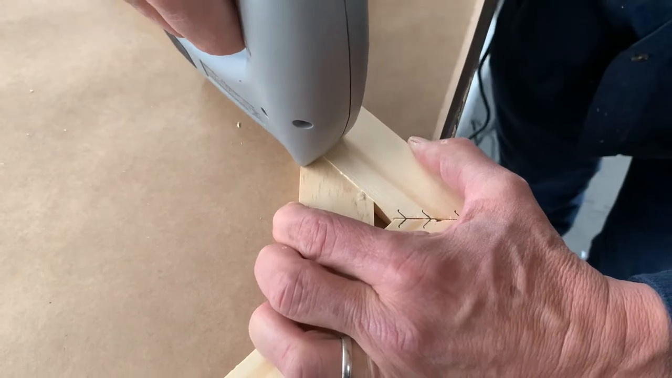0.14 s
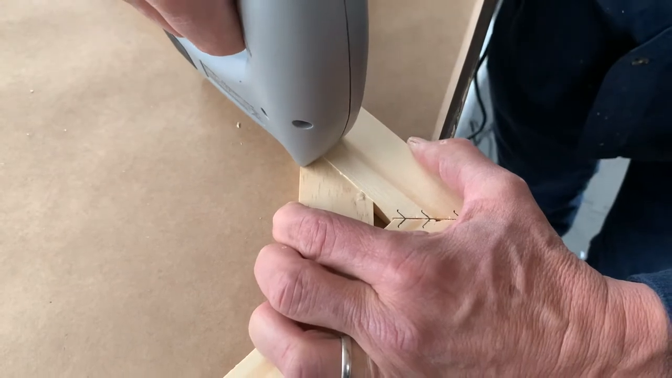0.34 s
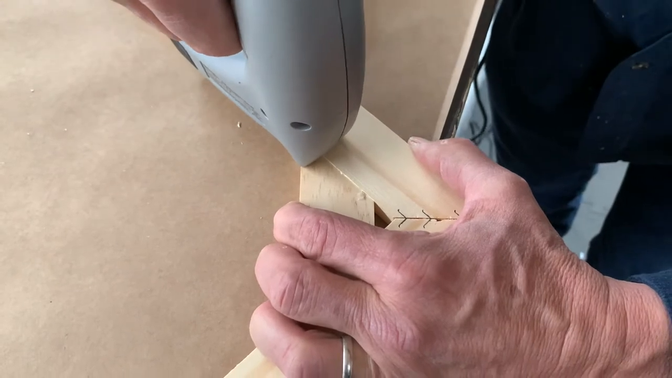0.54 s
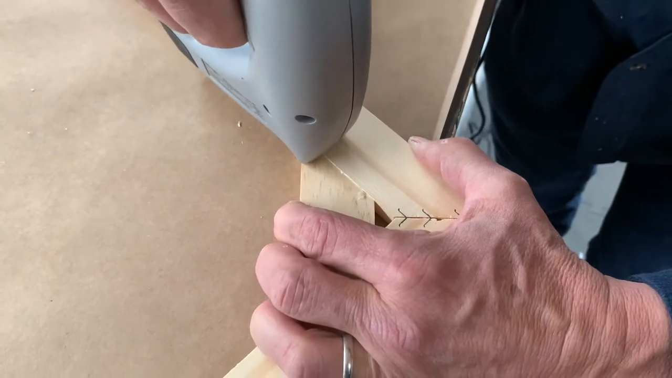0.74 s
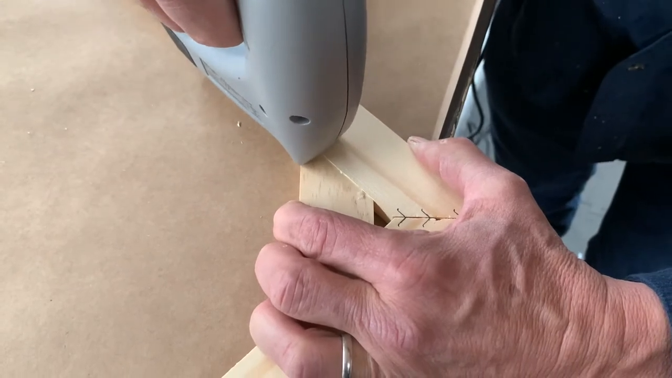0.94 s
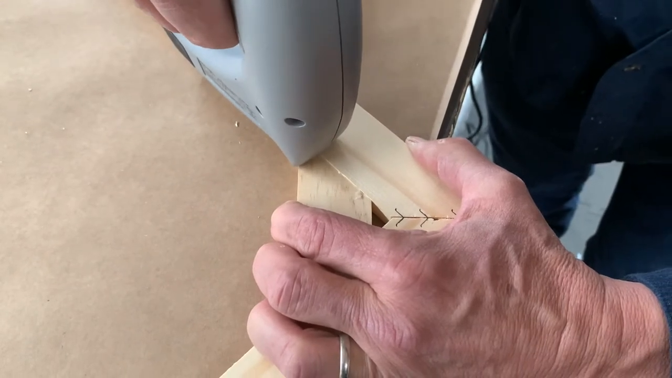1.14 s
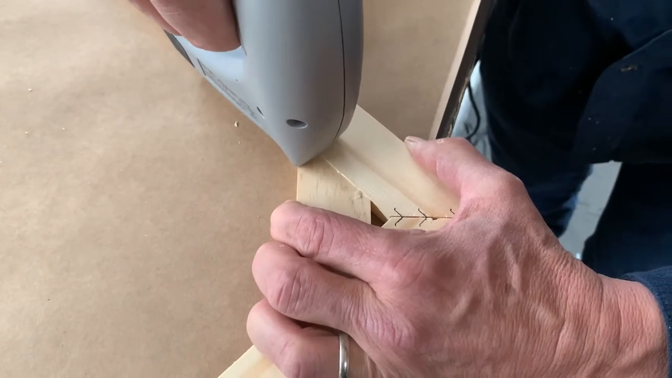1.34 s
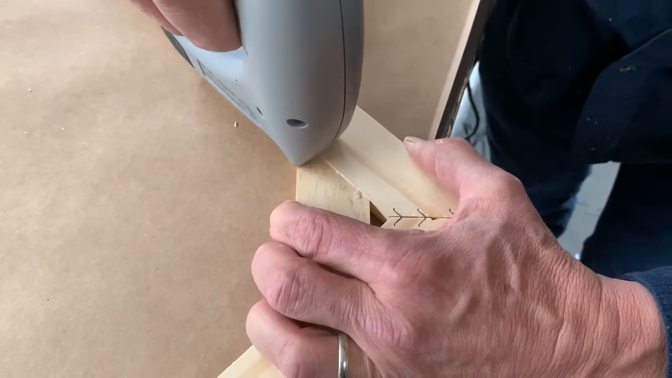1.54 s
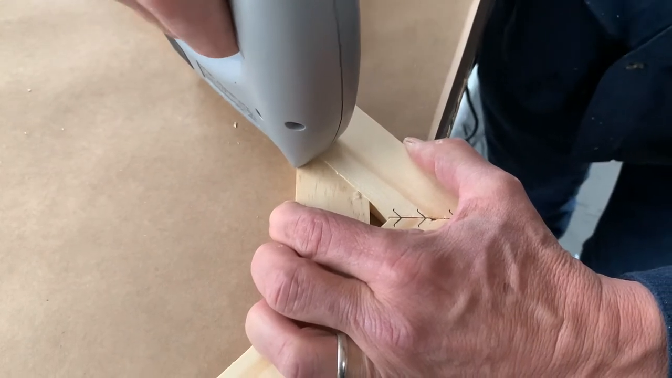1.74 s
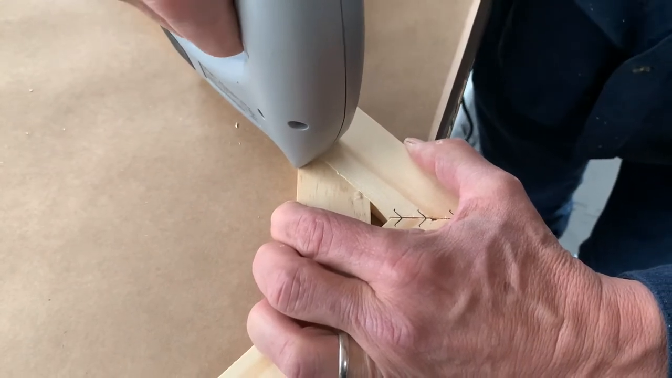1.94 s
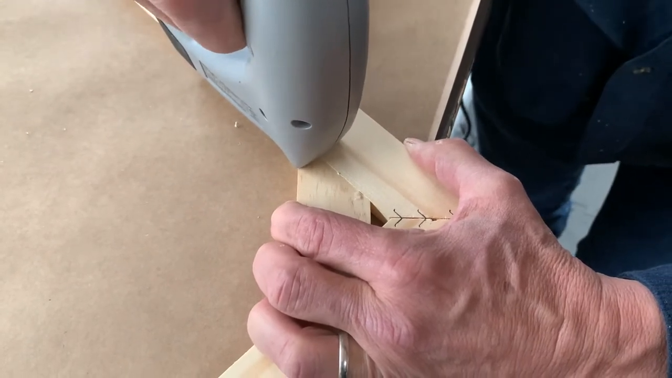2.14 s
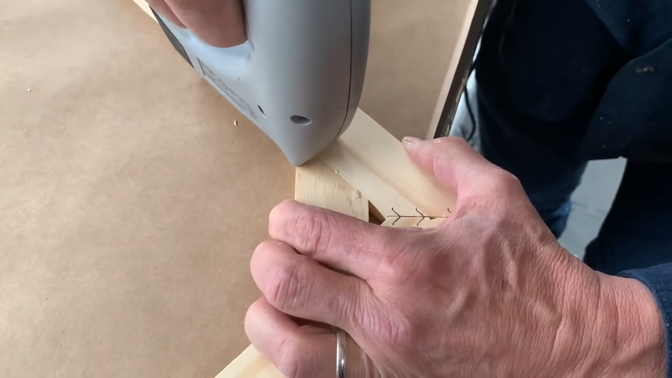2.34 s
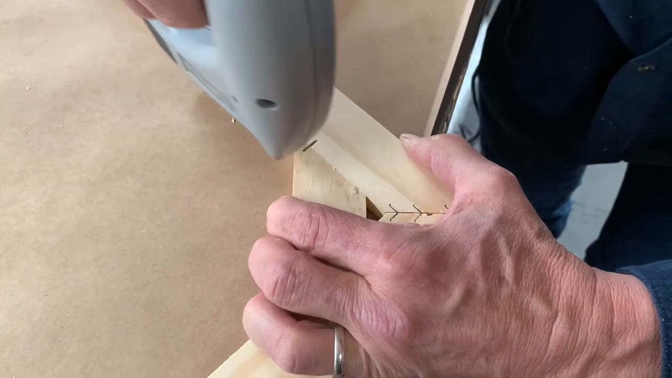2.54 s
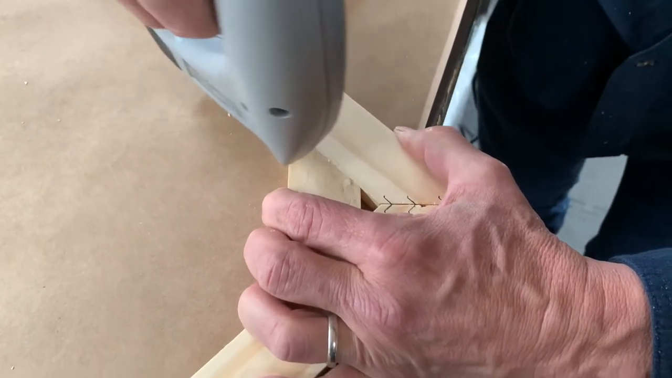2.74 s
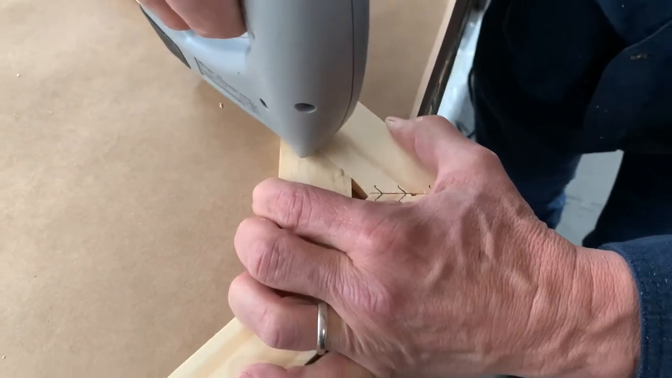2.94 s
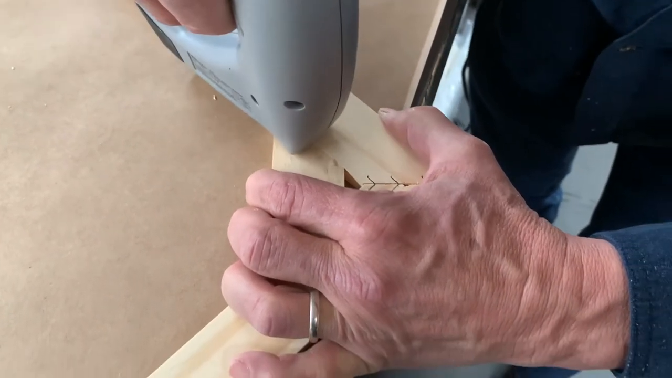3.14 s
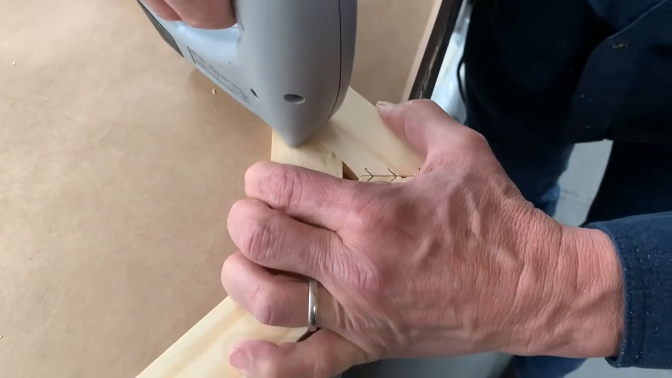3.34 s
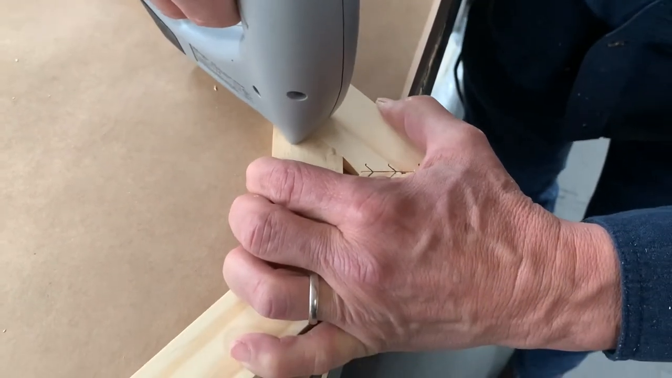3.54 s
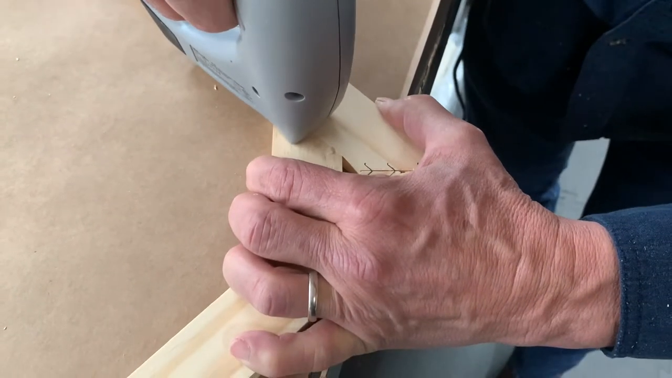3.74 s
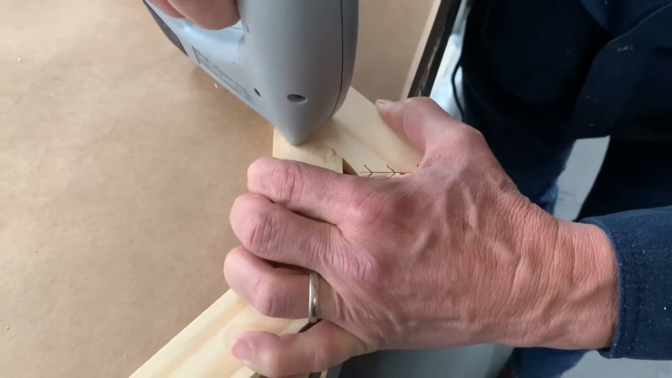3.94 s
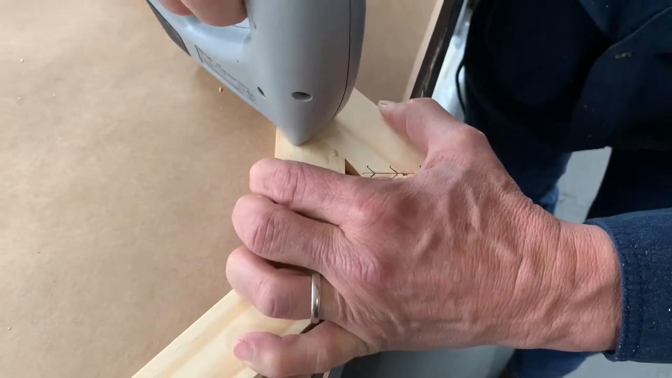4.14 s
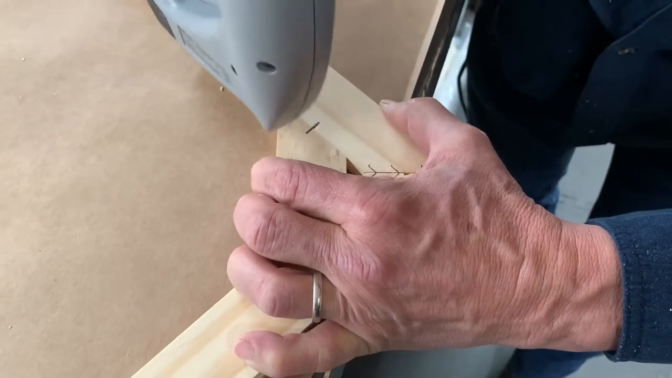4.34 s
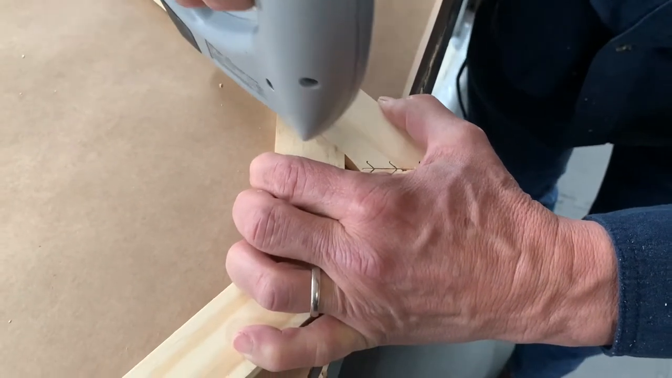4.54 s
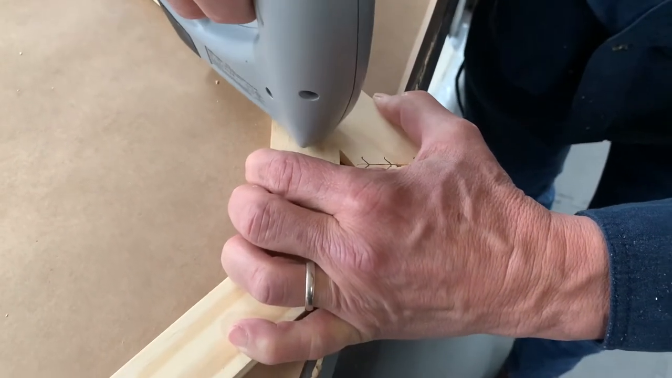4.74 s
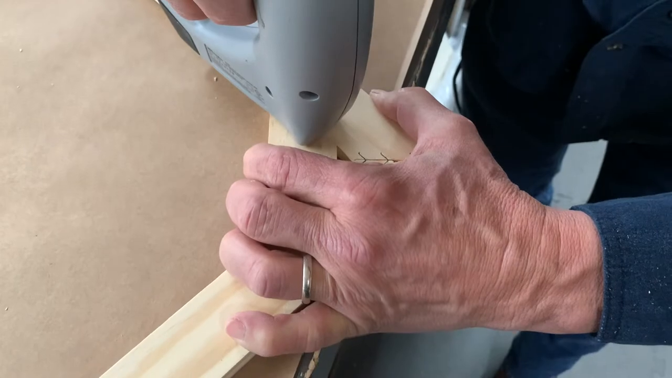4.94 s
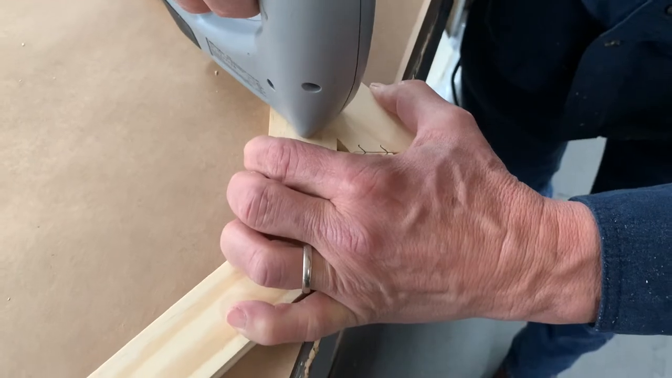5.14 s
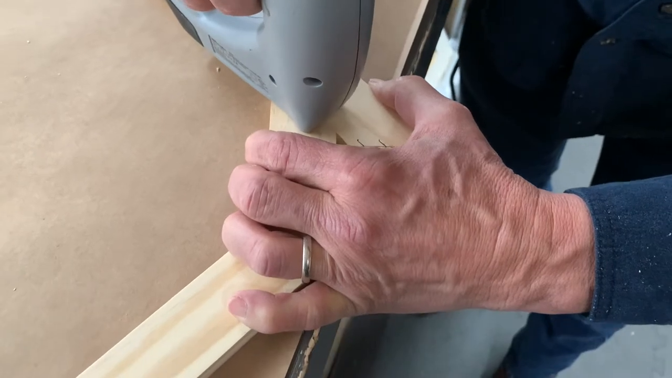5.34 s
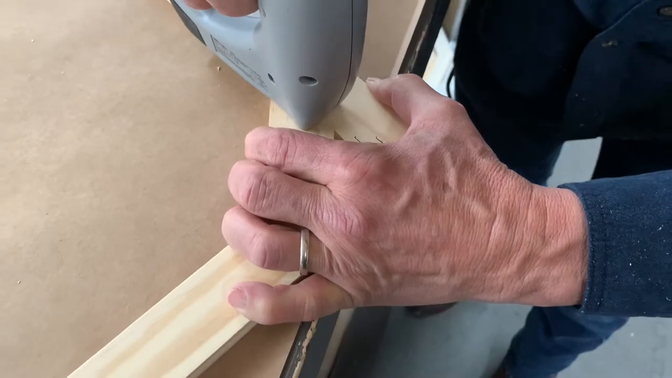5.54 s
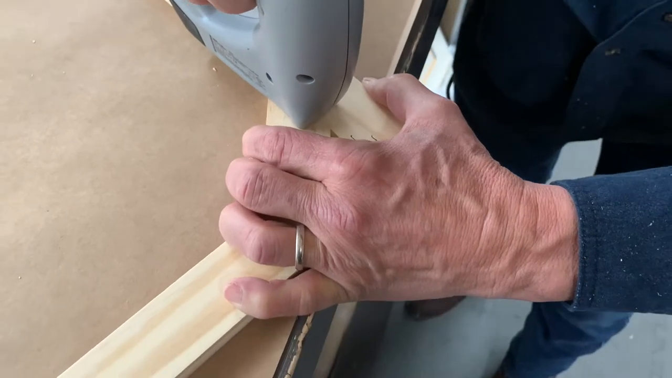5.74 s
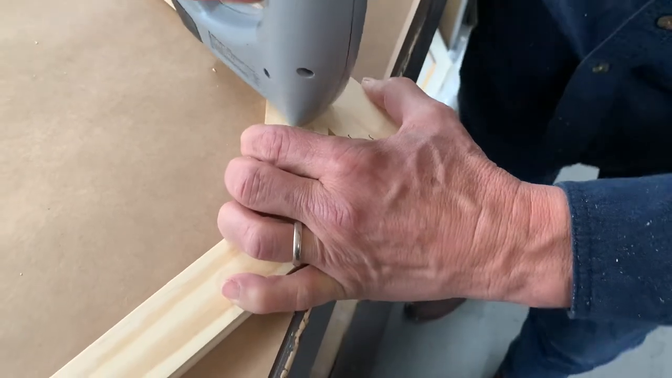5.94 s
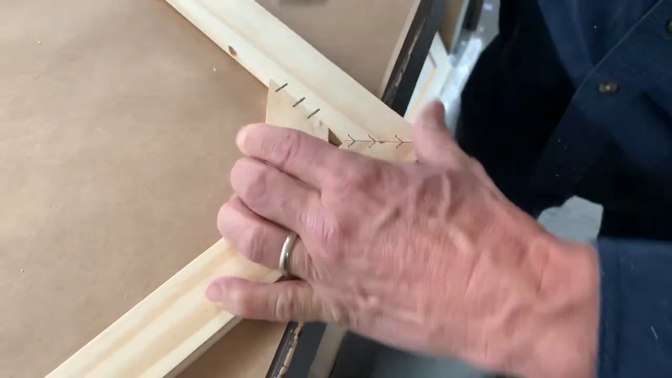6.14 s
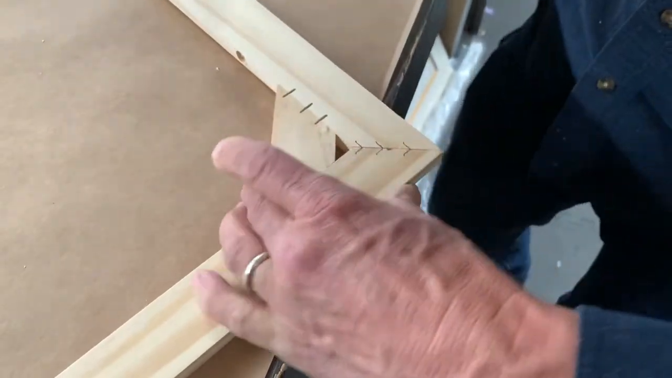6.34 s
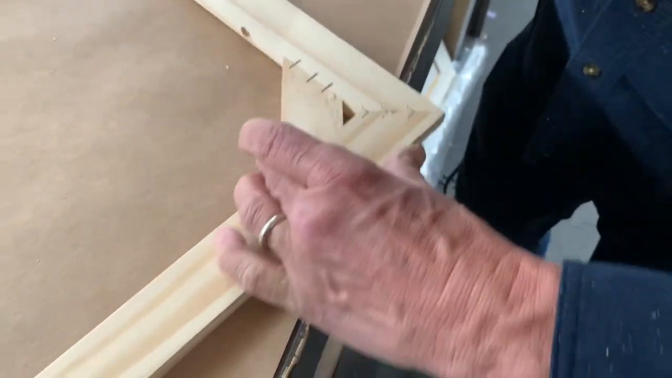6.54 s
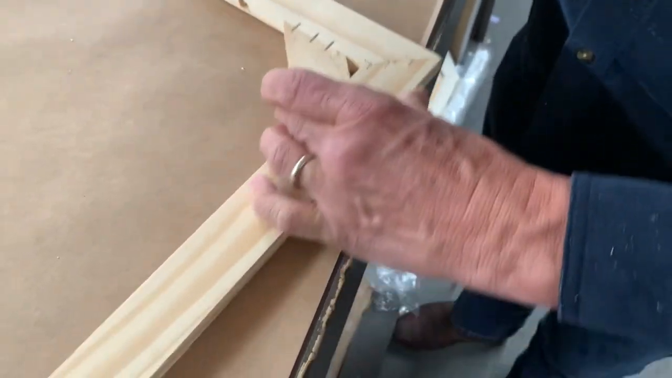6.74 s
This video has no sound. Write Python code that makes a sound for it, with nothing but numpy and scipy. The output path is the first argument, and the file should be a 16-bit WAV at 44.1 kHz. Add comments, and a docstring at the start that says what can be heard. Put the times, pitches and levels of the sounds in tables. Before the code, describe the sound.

A staple gun drives three staples into a wooden frame, each a sharp double clack with a metallic rattle, woody ring and short room tail. Between blows there are low bumps, taps and grainy rubbing, much quieter. A faint high electrical whine and low rumble sit beneath, an engine drones dimly outside late on, and wood scrapes at the end. Close microphone, small lively workshop.

```python
"""An electric staple gun drives three staples into a pine frame on a hollow bench, close to a two-port microphone:
each blow sums pushed ringing modes of the bench with bursts of coloured noise for the steel driver.
Between shots hands and tool knock, tick and rub on the wood (decaying sines, noise bursts, grainy noise),
and at the end the frame slides over the bench top. A lamp ballast whines faintly in sines over hiss and hum,
the workshop rumbles in low noise, and an engine drones by outside as a few gliding harmonics."""
import sys
import numpy as np
from scipy import signal
from scipy.fft import rfft, irfft
from scipy.io import wavfile
from scipy.ndimage import uniform_filter1d

SR = 44100
rng = np.random.default_rng(int(sys.argv[2]) if len(sys.argv) > 2 else 0)


def put_to_file(sound):
    """Save the sound as 16-bit audio at rate SR, in the file named by the first command-line argument."""
    columns = np.atleast_2d(sound).T  # one column per channel
    safe = np.clip(columns, -1, 1)
    whole_steps = np.round(safe * 32767)
    wavfile.write(sys.argv[1], SR, whole_steps.astype(np.int16))


N = 299880  # samples, 6.8 s

# Ringing modes of frame and bench. Each row: frequency in Hz, relative level in dB, time to fall 60 dB in seconds.
BENCH_MODES = [(72.46, 2.5, .22), (97, -9, 0.022), (143, -11.5, 0.049), (189, -5.5, 0.059),
               (267, -10, 0.079), (302, -6, 0.049), (412, -0.5, 0.024), (534, -11.5, 0.024),
               (673, -13, 0.089), (758, -19, 0.085), (956, -11.5, 0.14), (1126, -24.5, 0.17),
               (1910, -13.5, 0.28), (1985, -17.5, 0.096), (2320, -24, .05)]
# Bright spectrum of wood sliding and of tick edges. Each row: frequency in Hz, relative level in dB.
BRIGHT_WOOD = [(6500, -13), (7500, -1.5), (9500, -4), (11500, -6), (14000, -7.5), (16000, -12)]


def gain_of(db):
    """Decibels to amplitude."""
    return 10 ** (np.asarray(db) / 20)


def evened(x):
    """Scales to rms 1."""
    return x / np.sqrt(np.mean(x ** 2) + 1e-20)


def read(points, hz):
    """Reads a table on a log-frequency axis."""
    f, value = np.transpose(points)
    return np.interp(np.log(hz + 1), np.log(f + 1), value)


def add(mix, s, sound):
    """Mixes a sound in at time s."""
    part = mix[max(round(s * SR), 0):][:len(sound)]
    part += sound[:len(part)]


def coloured(x, spectrum):
    """Gives x a spectrum, cut off just beyond its ends, at rms 1."""
    hz = np.fft.rfftfreq(len(x), 1 / SR)
    inside = (hz > spectrum[0][0] * 0.8) & (hz < spectrum[-1][0] * 1.1)
    return evened(irfft(rfft(x) * gain_of(read(spectrum, hz)) * inside, len(x)))


def background():
    """Ballast whine as steady sines and hiss unlike at the two ports, over mains hum."""
    # Whine lines, at about multiples of twice the mains apart. Each row: frequency in Hz, rms in dB before the drift.
    whine_lines = [(8296, -105), (8533, -105), (8656, -101), (8775, -103), (8893, -99.5), (9017, -90),
                   (9135, -94), (9254, -93), (9372, -97), (9733, -107)]
    # Mains hum. Each row: frequency in Hz, rms level in dB.
    hum_lines = [(60, -77), (120, -85), (242, -79)]
    # Spectrum of the hiss. Each row: frequency in Hz, relative level in dB.
    hiss_colour = [(300, -5.5), (480, -6.5), (1300, -10.5), (4000, -18), (7200, -19.5), (9100, -15.5),
                   (11500, -18), (14500, -22.5), (16000, -31.5)]
    # Whine and hiss swell a little, then grow fainter. Each row: time in seconds, gain in dB.
    treble_drift = [(0, 0.5), (2.0, 4.5), (3.6, -1.5), (4.2, -6.5), (6.8, -11)]
    hiss_db = -82  # rms, before the drift
    t = np.arange(N) / SR

    def sines(lines):
        """Steady sines, each from a random phase."""
        return sum(np.sqrt(2) * gain_of(db) * np.sin(2 * np.pi * (hz * t + rng.random()))
                   for hz, db in lines)

    noise = rng.standard_normal((2, N))
    hiss = gain_of(hiss_db) * np.array([coloured(z, hiss_colour) for z in noise])
    drift = gain_of(np.interp(t, *np.transpose(treble_drift)))
    return drift * (sines(whine_lines) + hiss) + sines(hum_lines)


def gestures(rows, column):
    """Amplitude over the scene: each gesture swells in, holds and fades out; overlaps add in power."""
    ramp_db = 23.5  # how far below its hold level a gesture starts and ends
    t, power = np.arange(N) / SR, np.zeros(N)
    for row in rows:
        start, rise, hold, fall = row[:4]
        share = np.minimum((t - start) / rise, (start + rise + hold + fall - t) / fall)
        level_db = row[column] - ramp_db * (1 - np.clip(share, 0, 1))
        power += (share > 0) * gain_of(level_db) ** 2
    return np.sqrt(power)


def ports(x, knee_hz):
    """The left port leads, by up to a quarter turn above the knee, with a level difference."""
    # Balance of the ports. Each row: frequency in Hz, left minus right in dB.
    balance = [(60, 0), (300, -1), (700, 3), (1500, -2), (4400, -4), (6500, -2), (8000, 0)]
    hz = np.fft.rfftfreq(N, 1 / SR)
    lead = np.exp(1j * np.pi / 4 * np.tanh(hz / knee_hz))
    half = gain_of(read(balance, hz) / 2) * lead  # each side takes half the difference
    return irfft(rfft(x) * np.array([half, 1 / half]), N)


def handling():
    """Lumpy shaking of the bench; grainy friction spread along the wood, so unlike at the two ports."""
    # Hands lean on the frame and shake the bench. Each row: start, rise, hold and fall in seconds,
    # level of the deep boom in dB, level of the frame's body in dB.
    presses = [(0.0, 0.011, 0.042, 1.15, -64.5, -72), (1.55, 0.29, 0.56, 0.69, -49, -51.5),
               (3.3, .3, .1, .2, -55, -76), (3.62, .13, 0.22, 0.37, -51, -50.5),
               (5.25, 0.29, 0.096, 1.15, -57, -60.5), (6.4, 0.2, 0.14, 0.15, -54.5, -54.5)]
    # Strokes of wood on wood and card. Each row: start, rise, hold and fall in seconds,
    # level of the low rub in dB, of the treble in dB, of the sudden catches in dB.
    strokes = [(0.0, 0.007, 0.055, 0.13, -77.5, -90, -83), (1.56, .15, .26, .13, -75, -83, -66),
               (3.67, 0.047, 0.16, .02, -69, -79.5, -65), (5.38, .17, .01, .02, -69, -81, -63.5),
               (5.7, 0.26, .42, 0.062, -67, -67.5, -77), (6.3, 0.16, 0.096, 0.77, -59, -56.5, -77),
               (6.35, 0.31, 0.033, 0.59, -52, -50.5, -73)]
    # Spectra of the deep boom, the frame's body and the low rub. Each row: frequency in Hz, relative level in dB.
    boom_colour = [(12, -59.5), (20, -33), (43, -17), (59, -0.5), (72, -6.5), (97, -15.5), (135, -15),
                   (180, -50.5), (300, -120)]
    body_colour = [(71, -43), (120, -19.5), (189, -2), (265, -6.5), (306, -2.5), (370, -19), (513, -16),
                   (606, -49.5), (800, -28), (1040, -60), (1760, -120)]
    low_colour = [(300, -4), (430, -8), (530, -2), (650, -12.5), (1500, -12.5), (3000, -14), (5000, -14.5),
                  (7000, -21)]
    rest_boom_db, rest_body_db = -70.5, -79.5  # workshop rumble that never stops
    slips_per_s, slip_spread_db, slip_s = 37, 2.5, 0.0017

    boom, body, left, right, high, lumps, grain = rng.standard_normal((7, N))
    lumps = gain_of(3.0 * evened(uniform_filter1d(lumps, size=1200)))
    grain = gain_of(1.42 * evened(uniform_filter1d(grain, size=500)))  # slips shared by both bands

    boom_level = np.hypot(gestures(presses, column=4), gain_of(rest_boom_db))
    body_level = np.hypot(gestures(presses, column=5), gain_of(rest_body_db))
    shake = boom_level * coloured(boom, boom_colour) + body_level * coloured(body * lumps, body_colour)

    slip_starts = rng.random(N) < slips_per_s / SR
    slips = slip_starts * gain_of(slip_spread_db * np.minimum(rng.exponential(1, N), 3))
    slips = signal.lfilter([1], [1, -np.exp(-1 / (slip_s * SR))], slips)  # each slip dies away
    catches = slips * gestures(strokes, column=6)

    low = np.array([coloured(z * grain, low_colour) for z in (left, 0.13 * left + right)])
    treble = gestures(strokes, column=5) * coloured(high * grain, BRIGHT_WOOD)
    rub = (gestures(strokes, column=4) + catches) * low + treble
    return ports(shake, knee_hz=700) + rub


def knocks():
    """Dull knocks: a few soft cycles at the pitch of the struck spot, swelling over the first cycle."""
    # Knocks on bench and frame. Each row: start in seconds, level in dB, pitch in Hz,
    # time to fall 60 dB in seconds.
    struck_spots = [(0.203, -41.5, 63, .15), (0.317, -41.5, 67.5, .1), (0.33, -49, 194, .08),
                    (0.892, -36, 64, .057), (1.668, -31.5, 180.6, .057), (1.68, -25.5, 73, .072),
                    (1.741, -29.5, 65, .14), (1.855, -35, 207, .12), (1.892, -30.5, 71.74, .14),
                    (2.3, -42, 62.05, 0.17), (2.496, -31, 64.87, .086), (2.499, -34.5, 210, .05),
                    (2.545, -56, 60, .18), (2.838, -41.5, 273.1, .096), (2.84, -53, 560, .08),
                    (3.484, -24.5, 71.2, .2), (3.685, -43.5, 203.3, .06), (4.574, -35.5, 75, .12),
                    (5.2, -33, 74.7, .16), (6.102, -40.5, 75, .16), (6.525, -54, 535, .12),
                    (6.69, -47, 524, .12), (6.75, -49.5, 539, .1)]
    out, t = np.zeros(N), np.arange(SR // 4) / SR
    for s, db, hz, t60 in struck_spots:
        rise = (1 - np.exp(-t * hz * 1.5)) ** 2
        add(out, s, gain_of(db - 60 * t / t60) * rise * np.sin(2 * np.pi * hz * t))
    return out


def bench_ring(push_s, modes=BENCH_MODES):
    """A soft push of given length; the air follows the acceleration of each mode. Peak 1."""
    t = np.arange(SR // 3) / SR
    ring = -sum(gain_of(db - 60 * t / t60) * np.cos(2 * np.pi * hz * t) for hz, db, t60 in modes)
    ring = signal.oaconvolve(ring, np.hanning(round(push_s * SR)))
    return ring / abs(ring).max()


def ticks(rows, dying_s):
    """Short noise bursts around a centre pitch, some with a bright edge, some tapping the frame."""
    width = 1.1  # the colour's shoulders lie this factor either side of the centre
    out, t = np.zeros(N), np.arange(3000) / SR
    frame = bench_ring(0.0018, BENCH_MODES[4:9])  # the light frame alone
    fading = np.exp(-t / dying_s)
    noise = rng.standard_normal((len(rows), 2, len(t)))
    for (s, db, hz, bright_db, frame_db), (body_noise, edge_noise) in zip(rows, noise):
        colour = [(500, -15), (hz / width, -8), (hz, 0), (hz * width, -9), (14000, -38)]  # (Hz, dB)
        body = coloured(body_noise, colour) * fading
        edge = gain_of(bright_db) * coloured(edge_noise, BRIGHT_WOOD) * fading ** 2
        add(out, s, gain_of(db) * (body + edge))
        add(out, s, gain_of(db + frame_db) * frame)
    return out


def shots():
    """The driver rattles down its channel, slams the staple home and clacks back."""
    # The three shots. Each row: time of the main blow in seconds, blow in dB, driver rattle in dB,
    # rebound delay in seconds, rebound blow in dB, rebound clack in dB, hiss that swells in ahead in dB,
    # its rise in seconds, how far ahead of the blow it is full in seconds.
    staples = [(2.1149, -1, -13, 0.0079, -9, -11, -15.5, 0.0026, 0.015),
               (3.9152, -0.5, -12, 0.0081, -7, -9, -18, 0.0069, 0.0058),
               (5.5829, -0.5, -12, 0.0083, -10.5, -6, -20.5, 0.0064, 0.0039)]
    # Spectra of the driver in its channel and of the hiss ahead. Each row: frequency in Hz, relative level in dB.
    steel_colour = [(500, -4), (1000, 2), (2000, -9.5), (3200, -3.5), (6000, -9), (8500, -6.5), (11500, -7),
                    (14000, -14), (16000, -17.5)]
    lead_colour = [(900, -14.5), (2000, 2), (3500, -4), (6500, -7), (8000, -7.5), (9000, -39.5)]

    out, t = np.zeros(N), np.arange(-0.035, 0.06, 1 / SR)  # t = 0 at the main blow
    slow, hard, sharp = bench_ring(0.0039), bench_ring(0.002), bench_ring(0.00071)
    rattle = np.clip((t + 0.0085) / 0.004, 0, 1) * np.exp(-np.maximum(t + 0.001, 0) / 0.0008)
    buzz = 0.34 * np.exp(-np.maximum(t, 0) / 0.0066) * (t > -0.004)  # the casing buzzes on
    for s, blow_db, rattle_db, delay, rebound_db, clack_db, lead_db, rise, ahead in staples:
        steel, lead = rng.standard_normal((2, len(t)))
        clack = np.exp(-np.where(t < delay, (delay - t) / 0.00017, (t - delay) / 0.0018))
        swell = np.exp(np.minimum(t + ahead, 0) / rise) * np.clip(-t / 0.0021, 0, 1)
        driver_level = gain_of(rattle_db) * (rattle + buzz) + gain_of(clack_db) * clack
        driver = coloured(steel, steel_colour) * driver_level
        lead_in = gain_of(lead_db) * swell * coloured(lead, lead_colour)
        add(out, s + t[0], driver + lead_in)
        add(out, s - 0.005, gain_of(blow_db - 8.0) * sharp)  # the coil pulls and the tool kicks
        add(out, s - 0.0009, -gain_of(blow_db - 1.5) * sharp)  # the staple enters
        add(out, s, gain_of(blow_db) * hard)
        add(out, s + 0.0027, -gain_of(blow_db - 8) * slow)  # the bench top springs back
        add(out, s + delay, gain_of(rebound_db) * sharp)
    return out


def engine():
    """Only the lowest firing orders come through the wall, gliding in pitch and level."""
    # The engine's course. Each row: time in seconds, firing frequency in Hz, level in dB.
    course = [(4.22, 76.3, -72), (4.45, 78.7, -67.5), (4.75, 80.65, -62), (5.09, 84.4, -64.5),
              (5.301, 85.5, -68), (5.55, 84.4, -58.5), (5.9, 82.63, -70), (6.15, 83.6, -65),
              (6.45, 83.4, -72.5)]
    # Harmonics of the firing. Each row: multiple of the firing frequency, level in dB against the course.
    orders = [(1, 8), (2, -1), (3, -7)]
    s, hz, db = np.transpose(course)
    t = np.arange(N) / SR
    phase = 2 * np.pi * np.cumsum(np.interp(t, s, hz)) / SR
    tone = sum(gain_of(order_db) * np.sin(k * phase) for k, order_db in orders)
    level = gain_of(np.interp(t, s, db, left=-120, right=-120))
    return np.sqrt(2) * uniform_filter1d(level, size=2000) * tone


def room(x):
    """A noise tail for each side: a strong start that drops quickly, then each band dying at its own speed."""
    # Decay of the workshop. Each row: frequency in Hz, time to fall 60 dB in seconds.
    decay = [(100, 0.6), (300, .4), (1000, 0.37), (2500, 0.45), (5000, 0.35), (9000, 0.28), (12000, 0.29),
             (15000, 0.17)]
    # Colour of the tail. Each row: frequency in Hz, relative level in dB.
    colour = [(70, -14), (200, 0.5), (300, 2.5), (650, 4.5), (1000, 3), (1450, -3), (2000, 2), (2800, -5.5),
              (7000, -3.5), (15000, -15.5)]
    hz, t, z = signal.stft(rng.standard_normal((2, SR * 2 // 3)), SR, nperseg=256)
    same = 1 / (1 + (hz[:, None] / 700) ** 2)  # bass is alike on both sides
    z[1] = same * z[0] + np.sqrt(1 - same ** 2) * z[1]
    quick_drop = 3.4 * np.exp(-t / 0.0091)
    fall = gain_of(-60 * t / read(decay, hz)[:, None]) + quick_drop
    tail = signal.istft(z * fall * gain_of(read(colour, hz)[:, None]), SR, nperseg=256)[1]
    tail = np.pad(tail, ((0, 0), (300, 0)))  # the tail starts 300 samples late
    return signal.fftconvolve(x[None], tail / np.linalg.norm(tail[0]), axes=1)[:, :N]


def scene():
    """Bench sounds with their room, over engine and background."""
    # The clearest ticks of tool and wood. Each row: start in seconds, level in dB, centre in Hz,
    # bright edge in dB and frame tap in dB, both against the tick.
    tick_rows = [(0.328, -69.5, 1200, -18, 11), (0.481, -69, 2390, 0, -15), (0.79, -58.5, 1260, -23, -17),
                 (1.571, -60, 3000, -35, 6), (1.598, -52.5, 3440, -33, -15), (1.66, -57.5, 4070, 5.5, 7.5),
                 (1.767, -59, 2080, -2, 4.5), (1.844, -53.5, 2460, -7.5, -5), (1.858, -52, 2818, 1.5, 0),
                 (1.908, -55, 1480, -20, -4), (1.925, -49, 2391, -37, -3.5), (1.97, -53, 1093, -20, -3.5),
                 (2.001, -57, 4030, -8.5, -16), (2.045, -55.5, 1302, -20, -6.5),
                 (2.319, -61, 6500, -1, -18), (2.368, -43, 1360, -33, -1), (2.424, -56.5, 2540, -4, -6),
                 (2.499, -58, 1140, -25, -1), (2.836, -57, 920, -27, 17.5), (3.701, -50, 1860, -9, -6.5),
                 (3.721, -54, 2980, -15, -2), (3.75, -51.5, 1964, -21.5, -4), (3.785, -54, 2796, -17, -6.5),
                 (3.806, -53.5, 1305, -11.5, -9.5), (4.109, -68, 6550, 15, -19),
                 (4.162, -55, 1420, -34, -14), (4.571, -56, 1310, -35, 8), (4.599, -63, 2550, -30, 9.5),
                 (4.625, -72, 3224, -28, -9), (4.684, -67.5, 1956, -25, -18),
                 (5.137, -71.5, 1701, -19, -6.5), (5.417, -63, 1198, -23.5, -6),
                 (5.845, -54.5, 1413, -35, -3), (5.967, -52, 4600, -11, -2), (6.097, -50, 2300, -5, -1.5)]
    # A tick that drags on into a scuff. Each row: the same columns as the ticks.
    scuff_rows = [(6.335, -52.5, 2400, -18, -12)]
    gun = shots()
    small = ticks(tick_rows, dying_s=0.0033) + ticks(scuff_rows, dying_s=0.012) + knocks()
    near = ports(gun + small, knee_hz=900) + handling()
    reverberant = room(gain_of(-12.5) * gun + gain_of(-6.5) * small)
    return near + reverberant + engine() + background()


def record(dry):
    """Shared treble with a phase slope between the sides, soft overload, band limit."""
    split_hz = 6900  # above it both sides share the left port
    in_step_hz, turn_hz = 9200, 4700  # sides in step at the first, a full turn apart every turn_hz from there
    edge_hz = 16200
    hz, z = np.fft.rfftfreq(N, 1 / SR), rfft(dry)
    half = np.exp(-1j * np.pi * (hz - in_step_hz) / turn_hz)
    shared = 0.5 + 0.5 * np.tanh((hz - split_hz) / 250)
    x = irfft(shared * z[0] * np.array([half, 1 / half]) + (1 - shared) * z, N)
    x = 1.05 * np.tanh(x / 1.05)
    low_pass = signal.firwin(511, edge_hz, window=("kaiser", 9), fs=SR)
    return signal.oaconvolve(x, low_pass[None], "same")


dry = scene()
out = record(dry)
put_to_file(out)
```